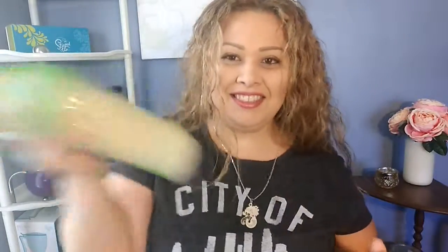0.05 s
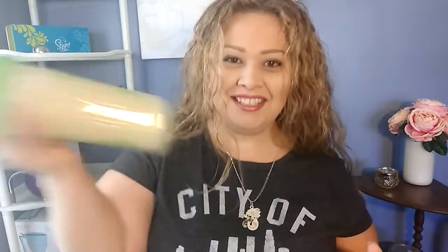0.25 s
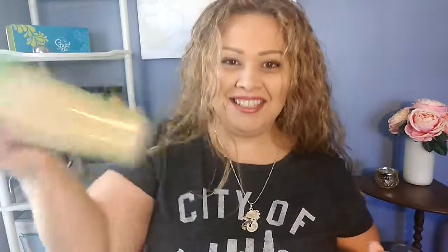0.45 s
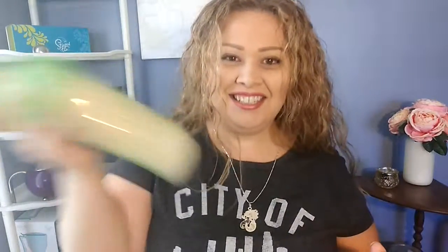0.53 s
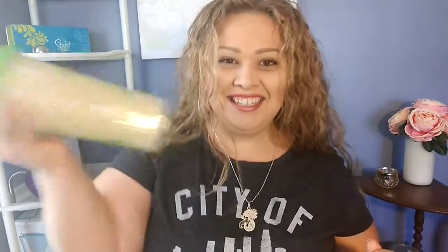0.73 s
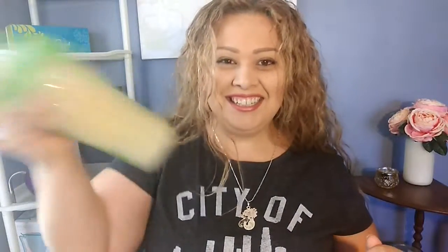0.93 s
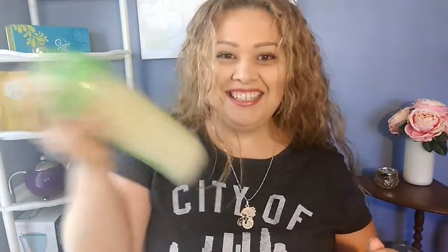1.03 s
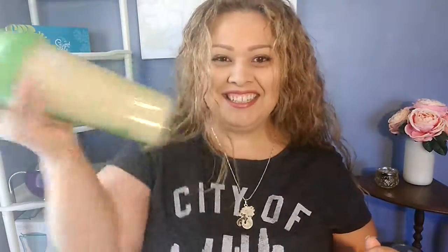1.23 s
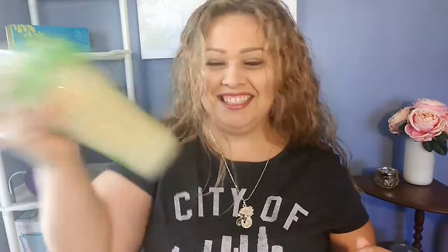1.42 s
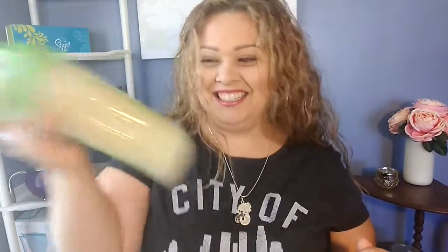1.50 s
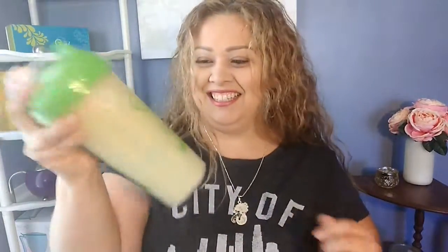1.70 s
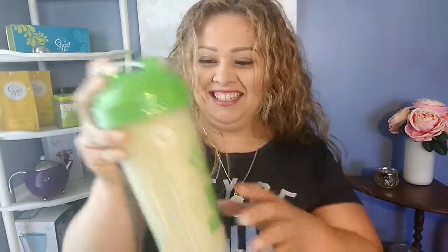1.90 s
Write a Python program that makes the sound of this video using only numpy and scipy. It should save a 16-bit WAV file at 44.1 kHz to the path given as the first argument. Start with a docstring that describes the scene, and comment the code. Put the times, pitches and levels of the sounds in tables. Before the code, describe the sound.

A plastic shaker bottle of thick drink is shaken hard, close by in a small room. From about 0.2 seconds the liquid hits the ends roughly four times a second, each stroke a sharp, hollow knock with frothy spatter and lighter slaps between. The strokes weaken, ending with a soft gulp near 1.6 seconds. The sound dies away into faint room hiss by about 1.9 seconds.

```python
"""A plastic shaker bottle of thick drink, shaken about four times a second in a small room, then stopped.
Each stroke slams the contents into one end: crack, hollow thump, short wall ring, spatter, then froth.
Lighter slaps fall between the blows, air pockets gulp, and a faint squeak comes at the end.
The room rings on over a faint hiss and hum."""
import sys
import numpy as np
from scipy import signal
from scipy.fft import rfft, irfft
from scipy.io import wavfile
from scipy.ndimage import uniform_filter1d

SR = 44100
rng = np.random.default_rng(int(sys.argv[2]) if len(sys.argv) > 2 else 0)


def dump(signal):
    """Clip the signal to [-1, 1] and save it as 16-bit WAV at the path in sys.argv[1]."""
    limited = np.clip(np.atleast_2d(signal).T, -1, 1)
    pcm = np.round(limited * 32767).astype(np.int16)
    wavfile.write(sys.argv[1], SR, pcm)


N = 85995

# blows on the bottle end:
# start_s, crack_db, tilt_db_per_octave, contact_s, thump_hz, thump_db, wall_hz, wall_db
BLOWS = [(.1840, -3, 2.8, 0.0017, 540, -6, 1333, -11.5), (.4165, -2, -0.4, .0014, 785, -0.5, 1476, -8),
         (0.6463, -12.5, -7, 0.0067, 920, -37, 1500, -11.5),
         (0.6536, -5, -0.1, 0.0011, 907, -9.5, 1644, -13), (0.9044, -6, 1, 0.00093, 704, -3.5, 1483, -14),
         (1.1389, -9, -8.5, 0.001, 562, -10.5, 913, -17.5), (1.1478, -8.5, 0, 0.0014, 869, -6, 1760, -17.5),
         (1.3755, -9, -1, 0.0018, 790, -11, 1960, -11), (1.3801, -8.5, -2.5, 0.0021, 630, -15, 1240, -20),
         (1.6215, -17, -4, 0.018, 820, -20, 1274, -12.5)]
# droplet spectrum: freq_hz, gain_db
SPATTER_SPECTRUM = [(100, -1), (400, -31), (1200, 4.5), (2500, -5.5), (4500, -5), (8000, -19), (16000, -27)]


def undb(db):
    return 10 ** (np.asarray(db) / 20)


def unit(x):
    """Scale to unit energy."""
    return x / np.sqrt(np.sum(x ** 2) + 1e-18)


def seconds(size=8192):
    return np.arange(size) / SR


def add(track, start_s, x):
    i = max(int(start_s * SR), 0)
    track[i:i + len(x)] += x[:len(track) - i]


def curve(hz, points):
    """Linear gain from (freq_hz, gain_db) points."""
    freq_hz, gain_db = np.array(points, float).T
    return undb(np.interp(np.log(hz + 1), np.log(freq_hz), gain_db))


def colour(x, points, tilt_db_per_octave=0):
    """Minimum-phase filter through (freq_hz, gain_db) points, tilted above 400 Hz."""
    size = 2 * len(x)
    hz = np.fft.rfftfreq(size, 1 / SR)
    log_tilt = np.log(undb(tilt_db_per_octave)) * np.log2(np.maximum(hz, 400))
    cepstrum = irfft(np.log(curve(hz, points)) + log_tilt)
    cepstrum[1:size // 2] *= 2
    cepstrum[size // 2 + 1:] = 0
    return irfft(rfft(x, size) * np.exp(rfft(cepstrum)))[:len(x)]


def burst(decay_s):
    """Dying cluster of tiny impacts, spectrally flat."""
    t = seconds()
    impacts = rng.choice([-1., 1.], len(t)) * np.exp(-t / max(decay_s, 1e-4))
    spectrum = rfft(impacts, 2 * len(t))
    smoothed = np.sqrt(uniform_filter1d(np.abs(spectrum) ** 2, size=300) + 1e-9)
    return irfft(spectrum / smoothed)[:len(t)]


def ring(hz, t60_s, rise_per_s=0):
    """Damped sine, optional upward glide."""
    t = seconds()
    phase = 2 * np.pi * hz * t * (1 + rise_per_s * t / 2)
    return unit(np.sin(phase) * np.exp(-np.log(1000) * t / t60_s))


def drops(size, rate_per_s=1800, spread_db=-0.5):
    """Dense clicks of uneven strength."""
    hits = rng.random(size) < rate_per_s / SR
    signs = rng.choice([-1., 1.], size)
    return hits * signs * undb(spread_db * np.minimum(rng.exponential(size=size), 4))


def diffuse(size, corner_hz=1050, pan_db=-2):
    """Stereo noise from all sides: bass largely in antiphase, treble uncorrelated."""
    hz = np.fft.rfftfreq(size, 1 / SR)
    coherence = 0.78 / (1 + (hz / corner_hz) ** 2)
    mid, side = (irfft(rfft(rng.standard_normal(size)) * np.sqrt(share / 2), size)
                 for share in (1 - coherence, 1 + coherence))
    return np.array([(mid + side) * undb(pan_db / 2), (mid - side) * undb(-pan_db / 2)])


def background(hiss_db=-62.5, hum_hz=106, hum_db=-77.5):
    """Faint room hiss and a low, unsteady hum."""
    # room noise spectrum: freq_hz, gain_db
    hiss_spectrum = [(18, -32), (30, -27), (103, -4), (149, -7.5), (184, -9), (215, -8.5), (239, -11),
                     (328, -11.5), (554, -14), (649, -15), (16000, -37.5)]
    hum_spectrum = [(hum_hz / 2, -30), (hum_hz, 0), (hum_hz * 2, -25), (hum_hz * 10, -70)]
    hiss = np.array([colour(channel, hiss_spectrum) for channel in diffuse(N)])
    hum = np.array([colour(channel, hum_spectrum) for channel in diffuse(N)])
    return undb(hiss_db) * hiss / hiss.std() + undb(hum_db) * hum / hum.std()


def swish(level_db=-68.5):
    """Liquid crackles along the wall, following the arm's effort."""
    # arm effort: time_s, gain_db
    effort = [(0, 12.5), (.13, -1.5), (.3, 0.5), (1.2, -0.5), (1.55, -1), (1.72, -8.5), (1.95, -0.5)]
    effort_db = np.interp(seconds(N), *np.array(effort).T)
    crackle = colour(drops(N), SPATTER_SPECTRUM)
    return crackle / crackle.std() * undb(level_db + effort_db)


def bottle_ring(detune_fraction=0.046):
    """Bottle modes, randomly detuned by the moving liquid."""
    # modes: pitch_hz, level_db, t60_s
    modes = [(343, -5.5, .05), (605, 1, .03), (790.5, -5, 0.066), (1270, -33, 0.037), (1392, 3.5, 0.032),
             (1877, -1, 0.062), (2783, -4, 0.065), (3197, 1.5, 0.044), (4027, -2.5, 0.0073),
             (4575, 1.5, 0.0073), (5060, -1, 0.049)]
    out = 0
    for pitch_hz, level_db, t60_s in modes:
        sign = rng.choice([-1, 1])
        loaded_hz = pitch_hz * (1 + detune_fraction * rng.standard_normal())
        out += sign * undb(level_db) * ring(loaded_hz, t60_s)
    return unit(out)


def slaps(ring_db=-5):
    """Light contacts of liquid ring the bottle, each with its own brightness."""
    # wall contacts: start_s, level_db, centre_hz, decay_s, two_octaves_up_db
    contacts = [(.001, -28.5, 2130, 0.06, -12), (0.0765, -25, 2880, 0.0015, -19),
                (0.0816, -30.5, 2380, 0.0012, -23), (.1520, -16.5, 3940, 0.00062, -44),
                (0.1795, -13, 1700, 0.006, -28), (.2720, -15, 4260, 0.00064, -30),
                (.3175, -18.5, 3180, 0.0031, -27), (0.396, -36, 5370, 0.0038, -39),
                (0.4105, -18, 2550, 0.011, -19), (0.551, -24, 3700, 0.0048, -44),
                (.566, -27.5, 3466, 0.0049, -29), (0.6277, -18.5, 1400, 0.0026, -26),
                (0.636, -25.5, 1470, 0.0028, -19), (0.778, -21.5, 4800, 0.014, -49),
                (0.7983, -20.5, 2400, 0.0068, -21), (.868, -38, 2800, .002, -33),
                (0.873, -26.5, 2700, 0.0048, -22), (0.882, -28, 1800, 0.01, -21),
                (0.8967, -21.5, 2220, 0.0068, -24), (.983, -26.5, 4060, .003, -29),
                (1.0527, -20, 2340, 0.0026, -14.5), (1.065, -36, 1840, 0.0056, -23),
                (1.117, -28, 4060, 0.0064, -37), (1.124, -18.5, 3340, 0.0048, -39),
                (1.3693, -16.5, 1860, 0.0022, -28), (1.434, -20, 2740, 0.0087, -24),
                (1.5229, -14.5, 1780, 0.0014, -26), (1.5324, -19, 1870, 0.0059, -25.5),
                (1.6560, -14.5, 3730, 0.00076, -25), (1.6835, -17.5, 1750, .0015, -21.5)]
    out = np.zeros(N)
    for start_s, level_db, hz, decay_s, top_db in contacts:
        spectrum = [(hz / 30, -42), (hz / 8, -26), (hz / 3, -11), (hz / 2.5, -1),
                    (hz, 0), (hz * 2, -8), (hz * 4, top_db), (hz * 16, 2 * top_db)]
        contact = unit(colour(burst(decay_s), spectrum))
        body = unit(colour(bottle_ring(), spectrum))
        add(out, start_s, undb(level_db) * unit(contact + undb(ring_db) * body))
    return out


def gulps(attack_s=0.00055):
    """Trapped air rings briefly, rising in pitch."""
    # air pockets: start_s, pitch_hz, level_db, t60_s
    pockets = [(.029, 425, -16.5, .04), (.033, 554, -18.5, 0.017), (1.6184, 767, -7, 0.026),
               (1.6413, 860, -17, 0.014)]
    out = np.zeros(N)
    attack = 1 - np.exp(-seconds() / attack_s)
    for start_s, pitch_hz, level_db, t60_s in pockets:
        add(out, start_s, undb(level_db) * unit(ring(pitch_hz, t60_s, rise_per_s=1.7) * attack))
    return out


def knocks(slam_db=-8, ring_db=-4.5, spatter_db=-6, spatter_decay_s=0.0096):
    """Each blow cracks, pushes the end wall, rings the bottle and throws spatter."""
    # impact spectrum: freq_hz, gain_db
    crack_spectrum = [(25, -66), (70, -22), (200, -8.5), (500, -10), (1000, -1), (2200, -4.5), (4500, -0.5),
                      (7000, -4), (10000, -16), (15000, -17.5)]
    # dull push of the liquid mass: freq_hz, gain_db
    slam_spectrum = [(30, -39), (120, -23.5), (230, -19), (350, -14), (560, -8.5), (800, -1.5), (1300, -21),
                     (3000, -34), (12000, -82)]
    out, t = np.zeros(N), seconds()
    for start_s, crack_db, tilt, contact_s, thump_hz, thump_db, wall_hz, wall_db in BLOWS:
        crack = unit(colour(burst(contact_s), crack_spectrum, tilt))
        slam = unit(colour(burst(decay_s=0.012), slam_spectrum))
        spatter = unit(colour(drops(len(t)) * np.exp(-t / spatter_decay_s), SPATTER_SPECTRUM))
        impact = crack + undb(slam_db) * slam + undb(ring_db) * bottle_ring() + undb(spatter_db) * spatter
        thump = undb(thump_db) * ring(thump_hz, t60_s=0.019)
        wall = undb(wall_db) * ring(wall_hz, t60_s=0.04)
        add(out, start_s, undb(crack_db) * impact + thump - wall)
    return out


def froth(gain_db=-12, decay_s=0.037):
    """Froth runs back along the wall after each blow, heard from all sides."""
    # froth spectrum: freq_hz, gain_db
    spectrum = [(100, -13.5), (400, -3), (1200, 5), (2500, 1), (4500, -5), (8000, -14), (16000, -29.5)]
    out, t = np.zeros((2, N)), seconds()
    swell = np.sqrt(t) * np.exp(-t / decay_s)
    for start_s, crack_db, *_ in BLOWS:
        for channel, side_db in zip(out, (-1.5, 1.5)):
            fizz = unit(colour(drops(len(t)) * swell, spectrum))
            add(channel, start_s, undb(crack_db + side_db + gain_db) * fizz)
    return out


def squeak(start_s=1.895, attack_s=0.0032, pitch_hz=2019, level_db=-72):
    """Thin, wavering squeak as the bottle comes to rest."""
    waver = uniform_filter1d(rng.standard_normal(N), size=400)
    hz = pitch_hz * (1 + 0.0027 * waver / waver.std())
    attack = np.clip((seconds(N) - start_s) / attack_s, 0, 1)
    return undb(level_db) * np.sqrt(2) * np.sin(2 * np.pi * np.cumsum(hz) / SR) * attack


def direct(x, left_lag_s=0.00015):
    """Two microphones of opposite polarity; the left is farther, so later and duller."""
    # balance: freq_hz, left_minus_right_db
    balance = [(100, -3), (600, 0.5), (1400, 0), (2800, -14), (5000, -18), (16000, -13)]
    hz = np.fft.rfftfreq(N, 1 / SR)
    pan = curve(hz, balance)
    left = -pan * np.exp(-2j * np.pi * hz * left_lag_s)
    response = np.array([left, np.ones(len(hz))]) / np.sqrt((1 + pan ** 2) / 2)
    return irfft(rfft(x) * response, N)


def room(x):
    """Early scatter off arm, body and shelves, then a tail whose treble dies first."""
    # room response: freq_hz, gain_db
    spectrum = [(30, 6), (100, -1.5), (240, 1), (340, 7), (480, 6), (750, -1.5), (1500, 1.5), (3500, 1.5),
                (7000, -1), (16000, 3)]
    tail_db, build_s, low_t60_s, high_t60_s = -9.5, 0.0048, 0.4, 0.33
    early_db, early_s = -9.5, 0.0066
    t = seconds(size=32768)
    noise = diffuse(len(t))
    low = signal.sosfilt(signal.butter(1, 2000, fs=SR, output="sos"), noise)
    tail = sum(band * np.exp(-np.log(1000) * t / t60_s)
               for band, t60_s in ((low, low_t60_s), (noise - low, high_t60_s)))
    tail = unit(tail * (1 - np.exp(-(t / build_s) ** 2)))
    early = unit(diffuse(len(t)) * t * np.exp(-2 * t / early_s))
    response = np.sqrt(2) * (undb(tail_db) * tail + undb(early_db) * early)
    return np.array([signal.fftconvolve(x, colour(channel, spectrum))[:N] for channel in response])


def scene(low_cut_hz=118):
    """The bottle, direct and through the room, over the background."""
    contents = undb(-4) * (knocks() + slaps() + gulps()) + swish() + squeak()
    # the bottle sounds carry little deep bass
    bottle = signal.sosfilt(signal.butter(2, low_cut_hz, "high", fs=SR, output="sos"), contents)
    return direct(bottle) + room(bottle) + undb(-1) * froth() + background()


def record(dry):
    """Steep low-pass."""
    cutoff_hz = 15800
    return signal.sosfilt(signal.ellip(8, .2, 70, cutoff_hz, fs=SR, output="sos"), dry)


dry = scene()
out = record(dry)
dump(out)
```